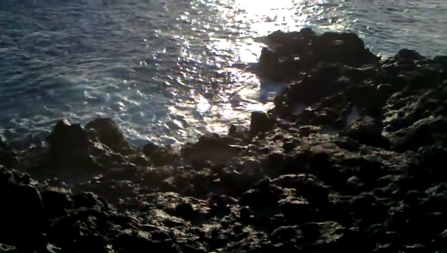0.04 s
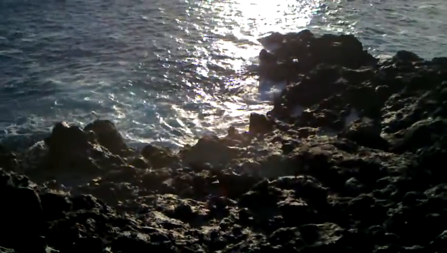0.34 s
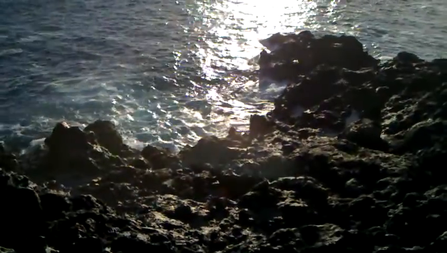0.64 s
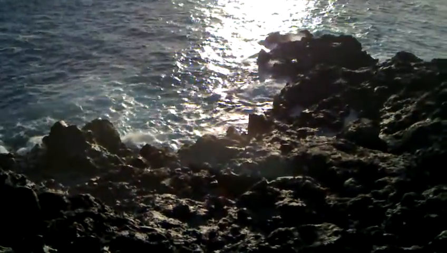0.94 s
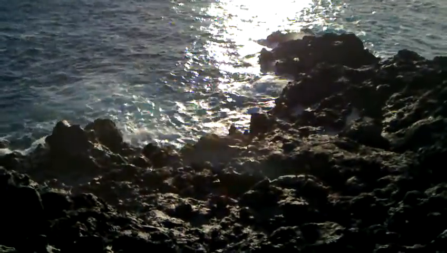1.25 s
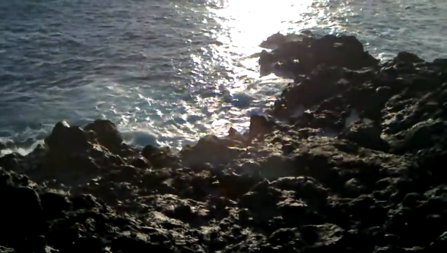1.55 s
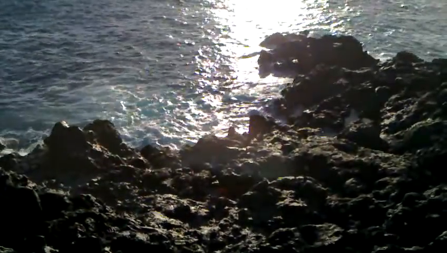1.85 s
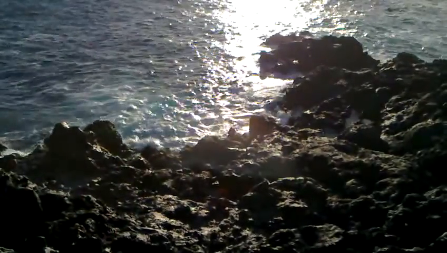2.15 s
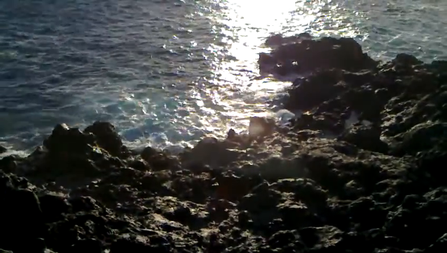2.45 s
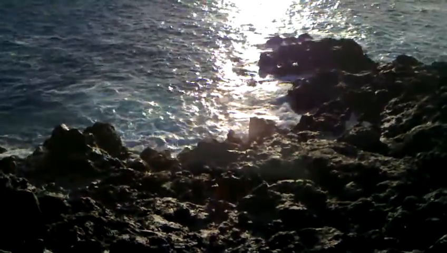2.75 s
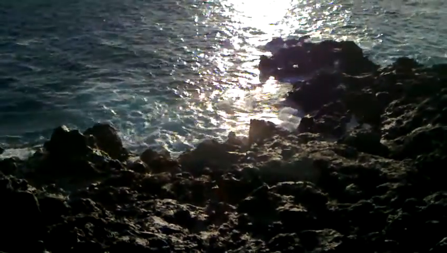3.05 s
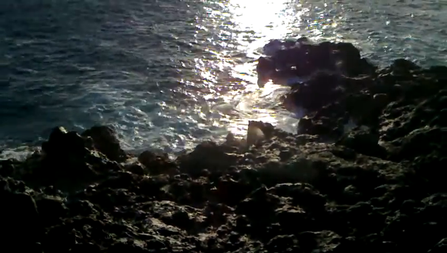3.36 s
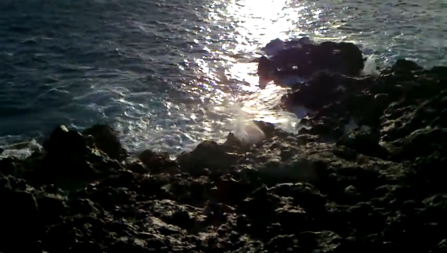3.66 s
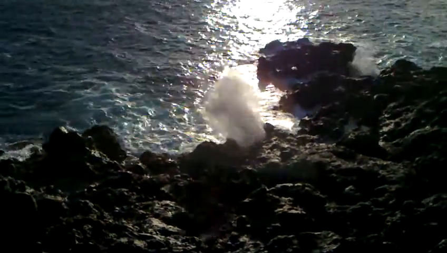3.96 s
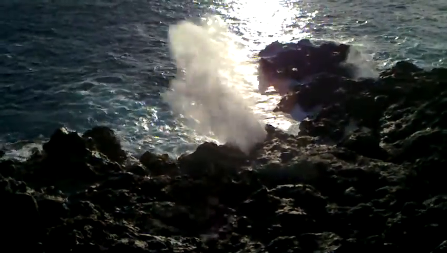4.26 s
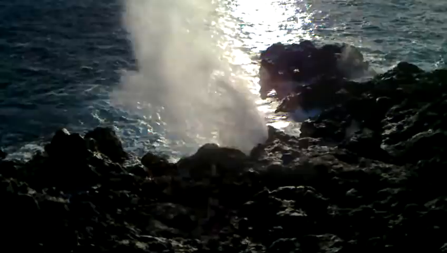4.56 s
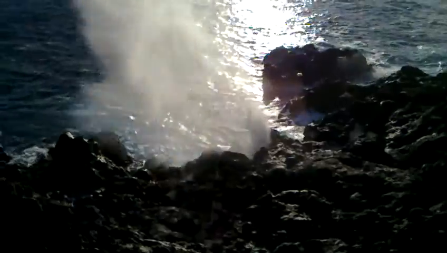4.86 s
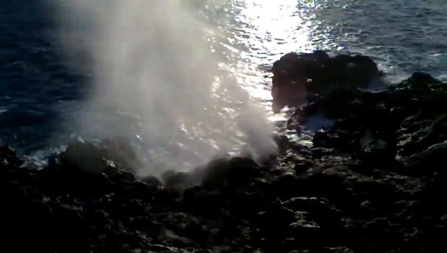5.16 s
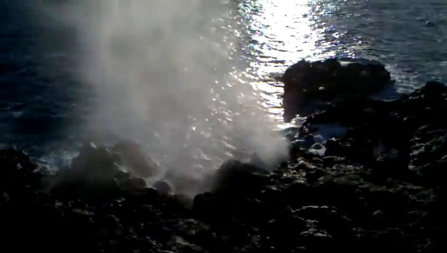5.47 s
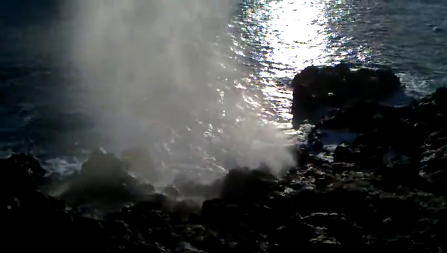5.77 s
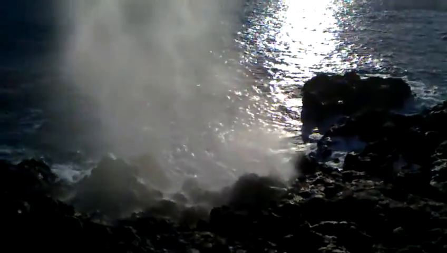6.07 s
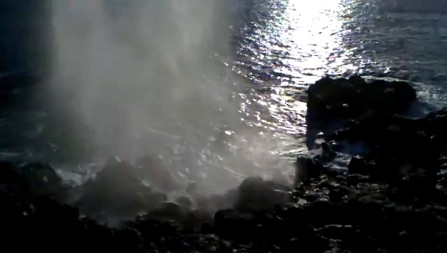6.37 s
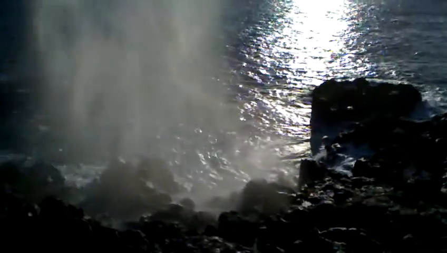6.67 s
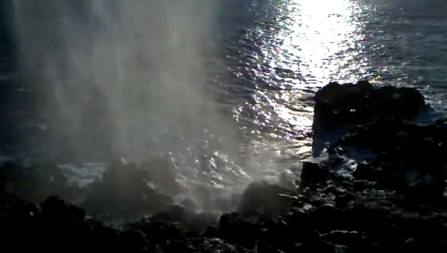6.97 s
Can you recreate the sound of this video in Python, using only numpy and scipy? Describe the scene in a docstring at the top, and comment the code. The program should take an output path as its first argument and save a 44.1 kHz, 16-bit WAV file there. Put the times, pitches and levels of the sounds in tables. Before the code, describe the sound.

Outdoors on a rocky coast, uneven wind flutters and thumps against a small microphone, over the constant foamy wash of the sea. Midway, a bright hiss bursts from a blowhole and fades into a dense, rain-like patter of spray landing on rock. The surf and the gusts carry on underneath, with the hardest gusts snapping on the microphone.

```python
"""On a rocky shore, surf churns and a blowhole hisses out a jet of mist; its spray rains on the rocks.
Gusts hit the microphone: big swirls of air rumble, small ones rasp, and the hardest ones snap.
The small camera colours the treble and whines faintly.
Its limiter turns everything down briefly at the hardest hits, so the sea dips under them."""
import sys
import numpy as np
from scipy import signal
from scipy.fft import rfft, irfft, next_fast_len
from scipy.io import wavfile
from scipy.ndimage import uniform_filter1d

SR = 44100
rng = np.random.default_rng(int(sys.argv[2]) if len(sys.argv) > 2 else 0)


def master(y):
    """Save y as 16-bit WAV."""
    cut = np.clip(np.atleast_2d(y).T, -1, 1)
    pcm = np.round(cut * 32767)  # scale
    wavfile.write(sys.argv[1], SR, pcm.astype(np.int16))


N = 310023
TIME = np.arange(N) / SR
SIZE = next_fast_len(N + 4096)  # extra room, so filtered sound does not wrap round to the start
FREQS = np.fft.rfftfreq(SIZE, 1 / SR)

# The tone of small, rasping swirls of air. Each row: frequency in Hz, relative level in dB.
RASP_COLOUR = [(60, -6.5), (250, -6.5), (500, 4), (800, 0), (1150, -8.5), (1600, -19), (2400, -27),
               (5000, -70)]


def gain_of(db):
    """Turns decibels into a number to multiply by."""
    return 10 ** (np.asarray(db) / 20)


def unit_level(x):
    """Scales a signal so that its average level (rms) is 1."""
    return x / np.sqrt(np.mean(x ** 2) + 1e-20)


def colour_db(colour):
    """Joins rows of (Hz, dB) into a level in dB for every frequency."""
    hz, db = np.transpose(colour)
    return np.interp(np.log(FREQS + 1), np.log(hz + 1), db)


def follow(rows):
    """Joins rows of (seconds, dB) into a gain for every sample."""
    seconds, db = np.transpose(rows)
    return gain_of(np.interp(TIME, seconds, db))


def coloured(x, colour, extra_db=0):
    """Turns each frequency of a sound up or down, following rows of (Hz, dB)."""
    return irfft(rfft(x, SIZE) * gain_of(colour_db(colour) + extra_db), SIZE)[:N]


def wander(rate_hz):
    """A smooth random curve that wobbles up to about the given rate."""
    t = np.arange(0, N / SR, 1 / 1000)
    hz = np.fft.rfftfreq(len(t), t[1])
    spectrum = rfft(rng.standard_normal(len(t))) / np.sqrt(1 + (hz / rate_hz) ** 4)
    return unit_level(np.interp(TIME, t, irfft(spectrum, len(t))))


def add(mix, start_s, sound):
    """Adds a sound into the mix at the given time."""
    part = mix[max(round(start_s * SR), 0):][:len(sound)]
    part += sound[:len(part)]


def churn(patchy_db):
    """Foam gathers and bursts: a hiss whose level drifts in patches of time and pitch."""
    spectra = signal.stft(rng.standard_normal(N), nperseg=512, noverlap=384)[2]
    patches = uniform_filter1d(rng.standard_normal(spectra.shape), size=7, axis=0)
    patches = unit_level(uniform_filter1d(patches, size=30, axis=1))
    hiss = signal.istft(spectra * gain_of(patchy_db * patches), nperseg=512, noverlap=384)[1]
    return unit_level(hiss[:N])


def drops(per_s, spread_db):
    """Drops land at random, one click each: mostly small, a few large."""
    size = gain_of(spread_db * np.minimum(rng.exponential(1, N), 4))
    return unit_level(size * rng.choice([-1., 1.], N) * (rng.random(N) < per_s / SR))


def surf():
    """The sea washes over the rocks: churning foam with countless small splashes."""
    # The rise and fall of the sea's wash. Each row: time in seconds, level in dB.
    swell = [(0, -36.5), (.5, -38), (1.1, -35.5), (1.6, -35), (2.0, -36.5), (2.6, -36), (3.0, -36.5),
             (3.45, -35), (4.0, -35.5), (4.6, -35.5), (5.3, -37), (6.2, -38), (7.03, -38)]
    # The tone of the surf. Each row: frequency in Hz, relative level in dB.
    surf_colour = [(25, 9.5), (120, 8), (250, 0.5), (450, 2), (700, 1.5), (1100, 3.5), (1700, 5),
                   (2300, 2.5), (3300, -7), (5000, -7.5), (7500, -12), (11500, -8.5), (14000, -10),
                   (15500, -7)]
    water = churn(patchy_db=-0.18) + gain_of(-21) * drops(per_s=2500, spread_db=3.5)
    wobble = gain_of(0.93 * wander(rate_hz=4.3))
    return follow(swell) * unit_level(coloured(water, surf_colour)) * wobble


def blowhole():
    """Air and mist hiss out of the hole, then the spray patters thickly on the rocks."""
    # The jet leaving the hole. Each row: time in seconds, level in dB.
    jet_levels = [(0, -77), (3.0, -62), (3.55, -55), (3.85, -34), (4.12, -33.5), (4.45, -36.5), (4.8, -43),
                  (5.4, -75), (7.03, -86)]
    # The tone of the jet. Each row: frequency in Hz, relative level in dB.
    jet_colour = [(300, -28), (1200, -30), (2000, 5.5), (3500, -11), (5000, 1), (7200, -2.5), (8500, -1),
                  (12500, -1), (13800, 3.5), (15000, 8), (15800, 2.5)]
    # The spray landing. Each row: time in seconds, level in dB.
    spray_levels = [(0, -68), (.85, -69), (1.0, -43.5), (1.4, -64), (2.0, -60.5), (3.0, -69), (4.4, -47),
                    (4.8, -41), (5.1, -35.5), (5.5, -33.5), (6.0, -32.5), (6.5, -33.5), (7.03, -36)]
    # The tone of the spray. Each row: frequency in Hz, relative level in dB.
    spray_colour = [(500, -32), (2000, 3), (3200, 0.5), (5000, 6.5), (6000, 1.5), (7000, 8.5), (8500, 6),
                    (11500, 1.5), (13300, 3), (14400, 5), (15600, -1)]
    jet = unit_level(coloured(churn(patchy_db=-1.5), jet_colour))
    landing = drops(per_s=6000, spread_db=2.5)
    patter = churn(patchy_db=0.5) + gain_of(-5.5) * landing
    spray = unit_level(coloured(patter, spray_colour))
    return follow(jet_levels) * jet + follow(spray_levels) * spray


def airflow():
    """How strong the wind's rumble and rasp are: each gust jumps above the breeze, holds and lets go."""
    # The light breeze between gusts. Each row: time in seconds, rumble strength in dB.
    breeze = [(0, -41), (.9, -40), (1.1, -44), (1.5, -41), (1.7, -49), (2.2, -42), (2.55, -44), (2.68, -36),
              (3.1, -48), (3.45, -46), (3.7, -36.5), (4.8, -32), (6.0, -39), (7.03, -45)]
    # Gusts on the microphone. Each row: start and length in seconds, rumble and rasp strength in dB.
    gusts = [(0.0, 0.24, -26, -32.5), (0.31, 0.34, -28.5, -45.5), (0.544, 0.22, -26, -26.5),
             (0.772, 0.147, -26, -29.5), (.92, .06, -31, -34.5), (1.139, .14, -30.5, -42.5),
             (1.298, 0.19, -35, -56), (1.758, 0.16, -36.5, -55), (2.043, 0.15, -28.5, -38),
             (2.232, .15, -28, -33.5), (2.405, .1, -31.5, -36.5), (2.711, 0.21, -26.5, -33.5),
             (2.951, 0.1, -26.5, -22.5), (3.122, 0.19, -31, -38.5), (3.739, 0.14, -22, -38),
             (3.892, 0.09, -23, -29), (4.014, 0.22, -29, -35.5), (4.267, .025, -29, -25.5),
             (4.316, .11, -29.5, -36), (4.458, 0.0191, -23.5, -29), (4.517, .06, -28, -46),
             (4.602, 0.1, -25.5, -26.5), (4.738, 0.0722, -23, -31.5), (4.952, 0.084, -25.5, -36.5),
             (5.083, .1, -24, -30), (5.217, .04, -24, -43.5), (5.296, 0.107, -25, -30.5),
             (5.438, 0.18, -30.5, -46), (5.621, 0.12, -23.5, -27), (5.76, 0.19, -29.5, -48.5),
             (5.954, 0.15, -32, -47.5), (6.114, 0.043, -23, -29), (6.215, 0.1, -24, -33),
             (6.35, 0.095, -28.5, -42.5), (6.478, 0.11, -30, -51), (6.634, 0.14, -24.5, -29),
             (6.83, .11, -26.5, -44), (6.97, 0.042, -23.5, -29)]
    attack_s, release_s = 0.005, 0.0059
    rumble = follow(breeze)
    rasp = rumble * gain_of(-10.5)
    for start, length, rumble_db, rasp_db in gusts:
        attack = np.clip((TIME - start) / attack_s + .5, 0, 1)
        release = np.clip((start + length - TIME) / release_s + .5, 0, 1)
        rumble = np.maximum(rumble, gain_of(rumble_db) * attack * release)
        rasp = np.maximum(rasp, gain_of(rasp_db) * attack * release)
    return rumble, rasp


def turbulence(colour, steady):
    """The noise of tumbling air; steady (0 to 1) says how much its slow swings are evened out."""
    pressure = unit_level(coloured(rng.standard_normal(N), colour))
    power = uniform_filter1d(pressure ** 2, size=1300) + 1e-6
    return unit_level(pressure / power ** (steady / 2))


def shedding(hz, waver, sharpness):
    """Swirls peel off the camera's edge at an unsteady rate, each making a narrow peak of pressure."""
    unsteady_hz = hz * np.exp(waver * wander(rate_hz=70) + .2 * wander(rate_hz=12))
    turns = np.cumsum(unsteady_hz) / SR
    pressure = np.exp(sharpness * np.cos(2 * np.pi * turns)) * gain_of(1.36 * wander(rate_hz=170))
    high_pass = signal.butter(2, 90, "high", fs=SR)
    return unit_level(signal.lfilter(*high_pass, pressure - pressure.mean()))


def wind(strength, rasp_strength):
    """Big swirls flutter over a soft draught; small ones rasp in bursts on their pressure peaks."""
    # The tone of the deep draught. Each row: frequency in Hz, relative level in dB.
    draught_colour = [(15, -14), (40, -4), (80, 4), (150, 2.5), (280, -26), (600, -54), (2000, -80)]
    # The tone of the big swirls. Each row: frequency in Hz, relative level in dB.
    rumble_colour = [(15, -40), (40, -23), (100, -6), (200, -2), (320, -3), (480, -8.5), (800, -21),
                     (1600, -67), (4000, -86)]
    calm_db, puff_db = -29, 12.5  # wind weaker than calm_db breaks up into separate puffs
    force = strength / gain_of(calm_db)
    bursts = np.tanh(wander(rate_hz=49.5))
    # The draught grows more slowly than the rest, so lulls sound deeper.
    draught = turbulence(draught_colour, steady=0.97) * strength ** 0.62
    shed_hz = 199.5 * force ** .22  # stronger wind sheds swirls faster
    swirls = turbulence(rumble_colour, steady=1.0)
    swirls += gain_of(0.5) * shedding(shed_hz, waver=.29, sharpness=0.96)
    flutter = unit_level(unit_level(swirls) * gain_of(2.33 * bursts))
    sputter = gain_of(5 * bursts + 9.7 * np.tanh(wander(rate_hz=48)) + 7.3 * np.tanh(flutter))
    rasp = unit_level(turbulence(RASP_COLOUR, steady=0.7) * sputter)
    calmness = 1 / (1 + force ** 2)
    puffs = gain_of(puff_db * calmness * (np.tanh(wander(rate_hz=34.4)) - 0.05))
    roar = gain_of(-0.66) * strength * flutter + gain_of(-2.2) * rasp_strength * rasp
    return gain_of(-17.0) * draught + puffs * roar


def vortex(db):
    """One swirl crosses the microphone's opening: its tight core snaps, its wide rim puffs softly."""
    core_hz, core_cycles, rim_hz, rim_s = 806, 0.53, 228, 0.003
    t = np.arange(-700, 700) / SR
    detune, core_phase, rim_phase = rng.uniform(-1, 1, 3) * [0.21, 0.35, 0.4]
    hz = core_hz * np.exp(detune)
    core = np.exp(-(t * hz / core_cycles) ** 2) * np.cos(2 * np.pi * (hz * t + core_phase))
    rim = np.exp(-(t / rim_s) ** 2) * np.cos(2 * np.pi * (rim_hz * t + rim_phase))
    return gain_of(db + 0.5) * core + gain_of(0.23 * db - 23.5) * rim  # even a weak swirl puffs fully


def buffets(strength):
    """Hard swirls hit, each trailing a short rasp; strays come more often and louder in strong wind."""
    # The hardest single swirls. Each row: time in seconds, strength in dB.
    hard_hits = [(.336, -21.5), (.429, -13.5), (.468, -20), (.534, -18), (0.633, -6.5), (0.681, -13),
                 (.744, -10.5), (0.797, -4.5), (.879, -10.5), (1.175, -20), (1.23, -23), (2.094, -12),
                 (2.269, -16), (2.354, -11.5), (2.444, -9.5), (2.471, -19), (2.76, -2.5), (2.793, -12.5),
                 (2.88, -9.5), (2.965, -12.5), (3.004, -17), (3.128, -15), (3.909, -17.5), (3.931, -15),
                 (4.045, -21), (4.1, -15.5), (4.613, -10), (4.628, -7.5), (4.664, -13.5), (4.748, -7),
                 (4.9, -18.5), (5.001, -14.5), (5.921, -13), (6.144, -17), (6.305, -13), (6.914, -18)]
    wake_db, wake_rise_s, wake_decay_s = -12.5, 0.0018, 0.0092  # the trailing rasp; dB against its hit
    strays_per_s, stray_db = 4, 6  # dB above the wind's strength
    lead_s = .0143  # a swirl starts early, so that it peaks close to its time
    hits, wake_level = np.zeros(N), np.zeros(N)
    t = TIME[:SR // 10]
    wake = np.minimum(t / wake_rise_s, 1) * np.exp(-t / wake_decay_s)
    for time_s, db in hard_hits:
        add(hits, time_s - lead_s, vortex(db))
        add(wake_level, time_s, gain_of(db + wake_db) * wake)
    stray_chance = strays_per_s / SR * strength / strength.mean()
    for at in np.flatnonzero(rng.random(N) < stray_chance):
        add(hits, at / SR - lead_s, vortex(20 * np.log10(strength[at]) + stray_db))
    return hits + wake_level * turbulence(RASP_COLOUR, steady=0.9)


def scene():
    """Sea, blowhole and wind meet at one microphone."""
    rumble, rasp = airflow()
    return (surf() + blowhole() + wind(rumble, rasp) + buffets(rumble))[None]


def microphone(x):
    """The microphone's small opening favours some pitches and cancels others."""
    # The broad humps and dips in the treble. Each row: frequency in Hz, gain in dB.
    response = [(2200, -1.5), (2850, -4), (3100, -2), (3500, -6.5), (4350, 0), (4900, 1.5), (5500, -2.5),
                (6600, -15), (7600, -13.5), (8600, -17.5), (9700, -25), (11200, -23.5), (12300, -24.5),
                (14800, -24)]
    # Narrow dips where sound cancels in the opening and off the camera's body.
    # Each row: frequency in Hz, half-width in Hz, gain in dB.
    notches = [(1910, 28, -4), (2800, 77, -2.5), (6840, 460, -2.5), (12200, 400, -1.5)]
    notches_db = sum(db / (1 + ((FREQS - hz) / width) ** 4) for hz, width, db in notches)
    return coloured(x, response, notches_db)


def limiter(x, threshold_db, recover_db_per_s, sense_hz, share):
    """Loud peaks turn the volume down at once, then it climbs back steadily; bass counts for less."""
    sensed = signal.lfilter(*signal.butter(1, sense_hz, "high", fs=SR), x)
    peak_db = 10 * np.log10(abs(uniform_filter1d(2 * sensed ** 2, size=120)) + 1e-12)
    cut_db = share * np.maximum(peak_db - threshold_db, 0)
    recovery_db = TIME * recover_db_per_s
    held_db = np.maximum.accumulate(cut_db + recovery_db) - recovery_db
    return x / gain_of(uniform_filter1d(held_db, size=40))


def camera_whine():
    """The camera gives off faint, steady, high tones."""
    # The tones of the whine. Each row: frequency in Hz, average (rms) level in dB.
    tones = [(7962, -82), (8877, -88), (9259, -88)]
    return sum(np.sqrt(2) * gain_of(db) * np.sin(2 * np.pi * hz * TIME) for hz, db in tones)


def record(dry):
    """The camera colours the sound, tames its peaks, adds a whine and cuts the highest treble."""
    heard = limiter(microphone(dry[0]), threshold_db=-26.0, recover_db_per_s=83, sense_hz=494, share=0.5)
    low_pass = signal.firwin(511, cutoff=15780, window=("kaiser", 9), fs=SR)
    return signal.oaconvolve(heard + camera_whine(), low_pass, "same")[None]


dry = scene()
out = record(dry)
master(out)
```